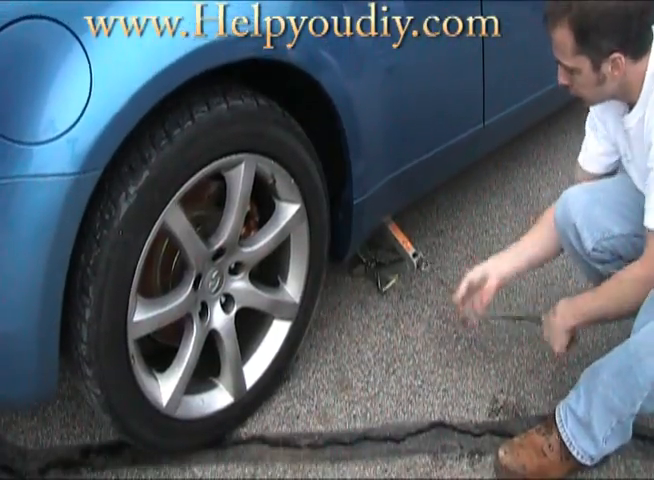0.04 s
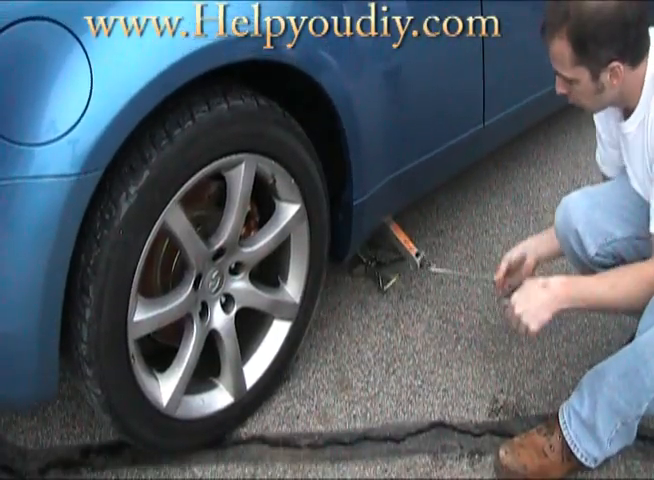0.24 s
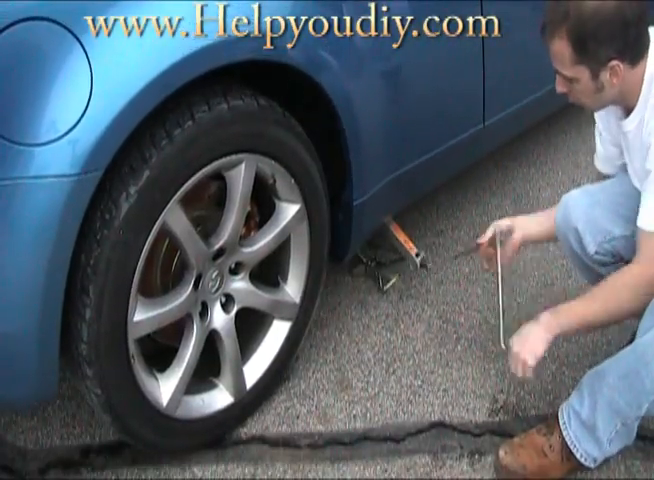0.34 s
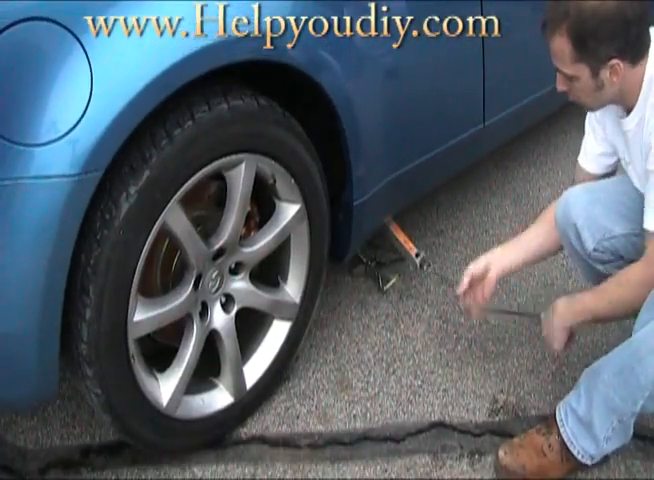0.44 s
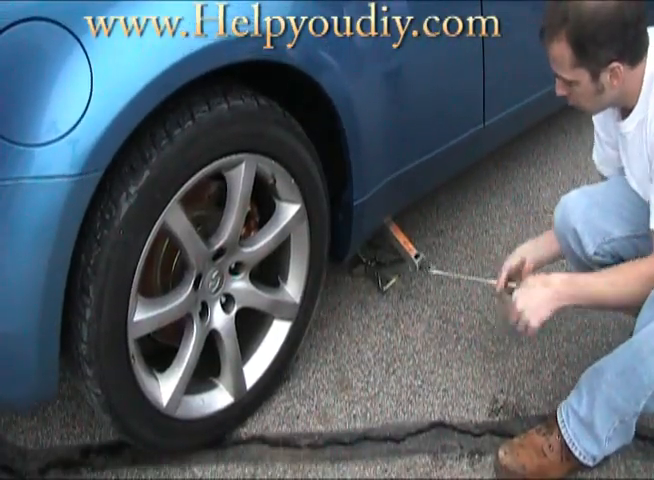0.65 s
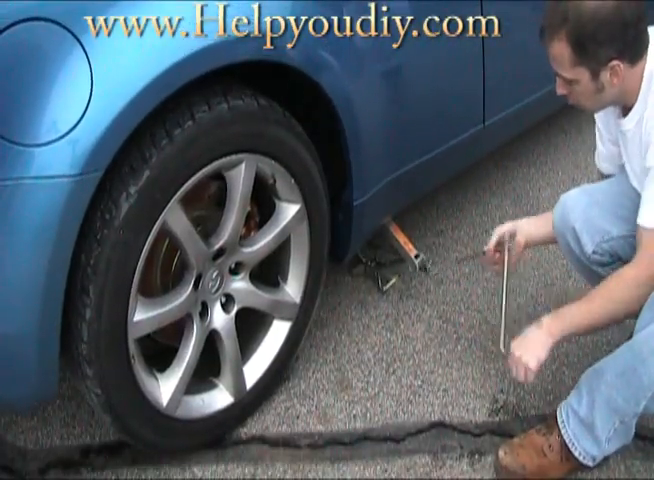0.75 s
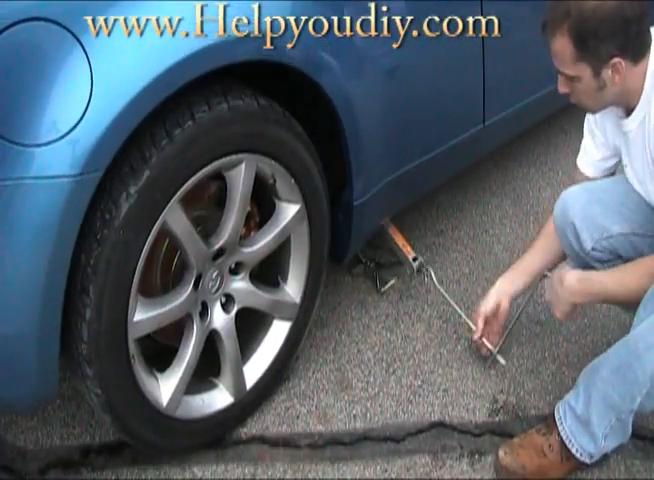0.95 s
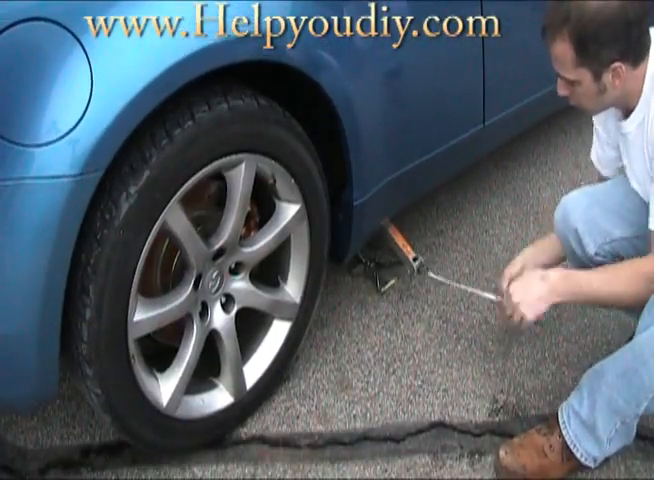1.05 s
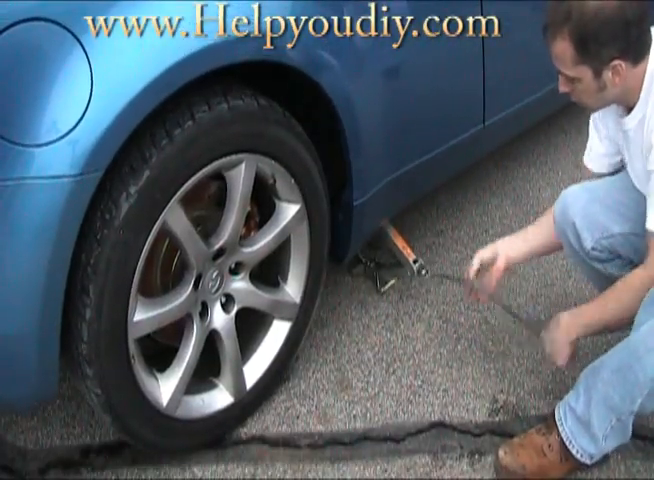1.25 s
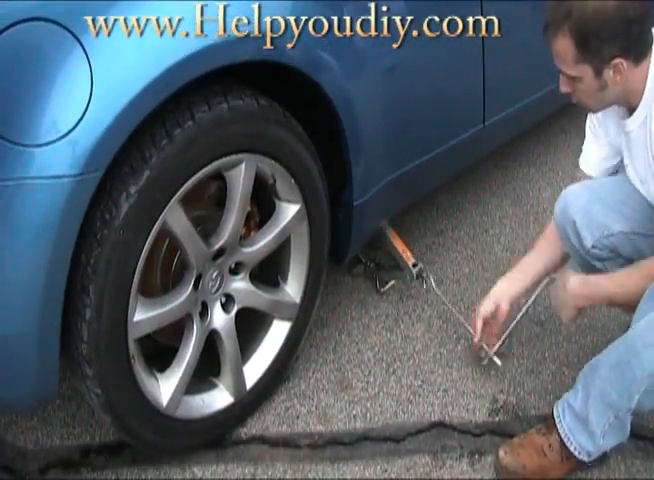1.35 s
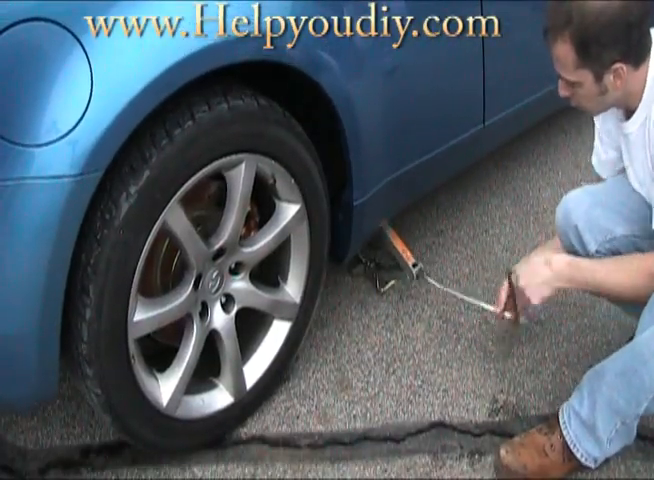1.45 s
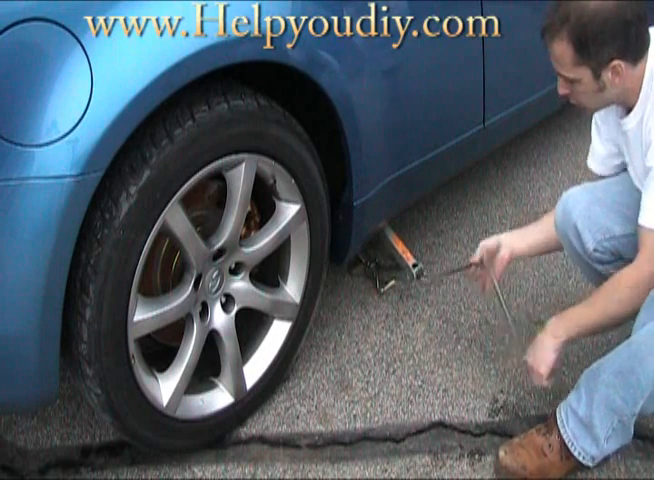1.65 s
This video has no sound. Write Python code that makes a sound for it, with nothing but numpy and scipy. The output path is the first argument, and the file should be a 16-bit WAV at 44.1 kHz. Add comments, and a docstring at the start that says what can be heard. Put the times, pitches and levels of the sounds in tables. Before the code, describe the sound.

Metal clanking of a jack cranked with a steel rod, heard close in stereo outdoors. A dry click at 0.15 s, a short slide, then a loud, bright chattering clank at 0.23-0.26 s whose ring quickly fades. Small ticks follow, with firmer clicks near 1.0 and 1.4 s and faint thread grit. Slight echo, distant traffic and a low hum that swells faintly around 1.45 s.

```python
"""A scissor jack under a car is cranked outdoors with a steel rod handle, heard close by in stereo.
Dry clicks and slides of the hook in the jack's eye, and faint screw-thread grit, are coloured noise.
Near the start the handle chatters into a loud clank: noise bursts, decaying rod modes and a beating pair.
Car body and house fronts return a faint echo; far off lie traffic, as shaped noise, and a low two-tone hum."""
import sys
import numpy as np
from scipy import signal
from scipy.fft import rfft, irfft
from scipy.io import wavfile

SR = 44100
rng = np.random.default_rng(int(sys.argv[2]) if len(sys.argv) > 2 else 0)


def wav_record(signal):
    """Record a signal, one row per channel, as 16-bit PCM in the file named by sys.argv[1]."""
    frames = np.transpose(np.atleast_2d(signal))
    bounded = np.clip(frames, -1, 1)
    # unit amplitude maps onto the largest positive 16-bit level
    quanta = np.round(bounded * 32767).astype(np.int16)
    wavfile.write(sys.argv[1], SR, quanta)


N = 72765
T = np.arange(N) / SR  # s
FREQS = np.maximum(np.arange(N // 2 + 1) * SR / N, 1)  # Hz

# Colour of the distant traffic: (frequency [Hz], relative density [dB per Hz])
TRAFFIC_COLOUR = [(15, -41), (25, -8.5), (113, -1), (281, -5.5), (340, -6.5), (598, -5.5), (895, -4.5),
                  (997, -7), (1080, -8), (1710, -12), (1850, -15), (2630, -20.5), (2850, -22.5),
                  (3720, -26), (4500, -28.5), (5430, -33), (6210, -29.5), (7700, -31), (9810, -36),
                  (14300, -41.5), (15500, -54)]
# Stereo side of the traffic against its middle: (frequency [Hz], level [dB])
TRAFFIC_SIDE = [(30,4),(80,-8.5),(300,-8),(900,-12),(3000,-2),(12000,-2.5)]
TRAFFIC_DB = -47
# Course of the upper hum tone: (time [s], level [dB])
HUM_LEVEL = [(0,-62),(0.6,-66),(0.9,-61),(1.15,-57),(1.45,-49),(1.65,-59)]
HUM_HZ, HUM_LOW_HZ, HUM_LOW_DB = 128.5, 66.5, -61

# Echoes from car body and house fronts: (delay [s], level [dB])
ECHOES = [(.0115,-19),(.027,-36.5),(.072,-34.5)]
NEAR_DB, NEAR_T60_S = -13, 0.087  # scatter under the car
YARD_DB, YARD_T60_S = -25.5, 0.47  # thin outdoor tail
YARD_TOP_HZ = 8950
ROD_SEND_DB = -4.5  # level of the rod's ringing fed to the echoes and tail

# Stereo side of the metal sounds against their middle: (frequency [Hz], level [dB])
METAL_SIDE = [(300,-20),(1200,-27.5),(3000,-25.5),(8000,-15.5),(14000,-2.5)]
CLICK_PAN_DB, CLANK_PAN_DB = -1.5, -1.9  # left against right

# Colour of the loaded jack: (frequency [Hz], relative level [dB])
JACK_COLOUR = [(100,-12.5),(600,-5.5),(1050,-5),(1900,2.5),(2400,5.5),(3400,1.5),(4500,0.5),(5450,-6.5),(6400,2),(7400,3.5),(9300,3.5),(10500,-5.5),(12500,-0.5),(14000,-21),(15500,-22)]
# Faint gritty rubs of the screw thread: (centre [s], half-length to 1/e [s], level [dB])
THREAD_RUBS = [(0.963,0.028,-57),(1.19,0.038,-68),(1.413,0.022,-56),(1.47,0.022,-63)]
THREAD_GRAINS_PER_S, THREAD_SCATTER_DB, THREAD_TOP_HZ = 560, 4, 6900
# The hook slides before it seats: (time [s], decay by 60 dB [s], level [dB], centre [Hz])
SLIDES = [(0.2124,0.026,-47,7000),(0.229,.028,-29,4547),(0.9887,0.043,-41.5,4500),(1.4355,.07,-43.5,4000),(1.4355,0.06,-47,10500)]
SLIDE_Q = 0.74
# Short rings in parts of the jack: (time [s], frequency [Hz], level [dB], decay by 60 dB [s])
RINGS = [(0.157,1080,-35.5,0.14),(0.157,2994,-35,.03),(0.306,5660,-41,0.1),(0.590,4510,-37,0.02),(0.684,2820,-51.5,0.099),(0.777,7420,-48,0.036),(0.983,4450,-47,0.036),(0.996,2342,-31.5,.035),(0.995,6970,-40,0.031),(1.408,2340,-31.5,0.042),(1.408,4404,-36,.03),(1.443,2990,-31,0.023),(1.445,6390,-51,0.02)]
RING_WOBBLE_RAD, RING_WOBBLE_HZ = 0.52, 148.8
# Hook knocks, relative levels in four bands:
# (time [s], low [dB], mid [dB], high [dB], top [dB], decay by 60 dB [s])
CLICKS = [(0.137,-55,-51.5,-71.5,-75.5,0.021),(0.157,-33.5,-30.5,-27,-37.5,0.016),(0.167,-35,-50.5,-64,-66.5,.03),(0.5912,-47,-51.5,-51.5,-49.5,0.021),(0.444,-60,-53.5,-74.5,-80.5,0.031),(0.641,-77.5,-62,-63,-75,0.022),(0.777,-58,-46.5,-62,-55.5,0.034),(0.845,-56,-50,-56,-77,0.03),(0.879,-60,-52.5,-57.5,-67,0.015),(0.928,-46.5,-48,-56,-73,0.028),(0.936,-56,-46.5,-52,-70.5,0.036),(0.996,-38.5,-34.5,-29,-66,0.022),(1.123,-62.5,-55,-62,-75,0.021),(1.2369,-55,-59.5,-56.5,-83,0.028),(1.3797,-52,-48,-56,-78.5,0.023),(1.4067,-41,-38.5,-40.5,-76.5,0.029),(1.4424,-35,-34.5,-27.5,-49.5,0.012),(1.475,-50,-45.5,-61,-62,0.027),(1.602,-85,-65.5,-62,-68,0.088),(1.6272,-66,-55,-62,-59,0.029)]
# Centres of those four bands: (frequency [Hz])
CLICK_BANDS_HZ = [1540, 3600, 7480, 11640]
CLICK_DB, CLICK_RING_DB, CLICK_ATTACK_S = 4, -28.5, 0.00069
BOUNCE_S, BOUNCE_DB = 0.0029, -9

# Blows of the chattering handle: (time [s], relative level [dB], treble tilt [dB per octave])
BLOWS = [(0.2322,-7,-4.5),(0.2356,0,-1.5),(0.2409,2.5,2),(0.2456,-3,-2),(0.2527,-5,13),(0.256,-6,-7.5),(0.2622,-13,-6.5)]
# Dense short modes of hook and jack: (frequency [Hz], relative density [dB per Hz])
RATTLE_COLOUR = [(100,-21),(300,-19.5),(800,-24.5),(1400,-16.5),(1950,-8),(2300,-0.5),(2700,-17),(3200,-5.5),(3600,-5),(4000,-2.5),(4750,1.5),(5400,-12.5),(5900,-3.5),(6500,-0.5),(7100,-3.5),(8200,-3),(9400,-3.5),(10900,-15),(11900,-7),(12600,-13),(13800,-24.5),(14500,-36),(15500,-41)]
RATTLE_DB, RATTLE_T60_S = -14, 0.037
RATTLE_TAIL_DB, RATTLE_TAIL_T60_S = -17, 0.14  # the jack's frame buzzes on after each blow
# Modes of the steel handle: (frequency [Hz], relative level [dB], decay by 60 dB [s])
HANDLE_MODES = [(2313,-24.5,0.092),(2998,-27,0.076),(3963,-26,0.05),(4612,-20,0.022),(4500,-40.5,0.058),(6485,-20,0.036),(6642,-21,0.026),(7240,-26.5,0.091),(8055,-22.5,0.066),(8160,-22.5,0.051),(8770,-25,0.034),(9240,-31,0.062),(11950,-32,.055),(11945,-28.5,0.074),(13600,-40,.07),(14880,-48,.055),(15600,-44,.055)]
PHASE_KICK_RAD = 0.81  # spread of the phase upset that a blow gives a mode
# Close, beating pair of the freed rod: (frequency [Hz], level [dB], decay by 60 dB [s])
SING_PAIR = [(3091,-21.5,0.19),(3102,-22,0.2)]
SING_S, SING_RISE_S, SING_BEAT_LAG_S = 0.253, 0.0023, 0.016

OVERLOAD, TOP_HZ = 1.23, 15900  # drive into the soft rounding; upper limit of the sound


def undb(db):
    """Amplitude ratio from decibels."""
    return 10 ** (np.asarray(db) / 20)


def curve(points):
    """Gain at each frequency from (Hz, dB) points, joined along log frequency."""
    hz, db = np.array(points, float).T
    return undb(np.interp(np.log(FREQS), np.log(hz), db))


def noise(gain):
    """Noise of rms 1 with the given colour."""
    x = irfft(gain * np.exp(2j * np.pi * rng.random(len(FREQS))), N)
    return x / x.std()


def slow(hz):
    """Smooth random wander of spread 1, up to about the given rate."""
    return noise(np.exp(-(FREQS / hz) ** 2))


def fade(start, t60, attack):
    """Quick rise, then exponential decay."""
    age = np.maximum(T - start, 0)
    return np.minimum(age / attack, 1) * np.exp(-np.log(1000) * age / t60)


def place(mid, side, pan_db):
    """Left and right from mid, side and balance."""
    return np.array([(mid + side) * undb(pan_db / 2), (mid - side) * undb(-pan_db / 2)])


def wide_noise(colour, side_colour, pan_db):
    """Stereo noise whose side keeps its own colour and its strength against the middle."""
    side_level = np.linalg.norm(side_colour) / np.linalg.norm(colour)
    return place(noise(colour), noise(side_colour) * side_level, pan_db)


def burst(colour, envelope, pan_db):
    """A short burst of dense vibration; its treble differs most between the ears."""
    return wide_noise(colour, colour * curve(METAL_SIDE), pan_db) * envelope


def traffic():
    """Distant traffic: many far sources merge into broad noise that wavers slightly."""
    colour = curve(TRAFFIC_COLOUR)
    level = undb(TRAFFIC_DB + .5 * slow(6))
    return level * wide_noise(colour, colour * curve(TRAFFIC_SIDE), .2)


def wavering_tone(hz):
    """Sine of rms 1 whose pitch wanders slightly, with a spread just under one percent."""
    pitch = hz * (1 + 0.0074 * slow(6.9))
    return np.sqrt(2) * np.sin(2 * np.pi * np.cumsum(pitch) / SR)


def hum():
    """A low, engine-like hum: two wavering tones, alike in both ears."""
    upper = undb(np.interp(T, *np.array(HUM_LEVEL).T)) * wavering_tone(HUM_HZ)
    lower = undb(HUM_LOW_DB + 3.8 * slow(7)) * wavering_tone(HUM_LOW_HZ)
    return upper + lower


def driveway(x):
    """Scatter under the car, a few distinct echoes and a thin outdoor tail."""
    dull = 1 / np.hypot(1, (FREQS / YARD_TOP_HZ) ** 2)
    response = np.zeros((2, N))
    for db, delay, t60 in [(NEAR_DB, .002, NEAR_T60_S), (YARD_DB, .03, YARD_T60_S)]:
        tail = place(noise(dull), .5 * noise(dull), 0) * fade(delay, t60, 0.0034)
        response += undb(db) * tail / np.sqrt(np.sum(tail ** 2) / 2)  # mean energy 1 per ear, then level
    for delay, db in ECHOES:
        response[:, int(delay * SR)] += undb(db)
    return signal.fftconvolve(x, response, axes=1)[:, :N]


def thread_rubs():
    """Faint gritty rub of the screw thread while cranking: random grains, swelling and fading."""
    struck = rng.random(N) < THREAD_GRAINS_PER_S / SR
    strength = rng.standard_normal(N) * undb(THREAD_SCATTER_DB * rng.standard_normal(N))
    colour = curve(JACK_COLOUR) / np.hypot(1, (FREQS / THREAD_TOP_HZ) ** 2)
    grit = irfft(rfft(struck * strength) * colour, N)
    swell = sum(undb(db) * np.exp(-((T - centre) / length) ** 2) for centre, length, db in THREAD_RUBS)
    return place(swell * grit / grit.std(), 0, CLICK_PAN_DB)


def slides():
    """Brief steel-on-steel rubs: noise around one centre, coloured by the jack."""
    out = 0
    for start, t60, db, hz in SLIDES:
        colour = curve(JACK_COLOUR) / (1 + (SLIDE_Q * (FREQS / hz - hz / FREQS)) ** 2)
        out = out + undb(db) * burst(colour, fade(start, t60, CLICK_ATTACK_S), CLICK_PAN_DB)
    return out


def rings():
    """Single parts of the jack ring for a moment: decaying sines of unsteady phase."""
    out = 0
    for start, hz, db, t60 in RINGS:
        phase = 2 * np.pi * hz * T + RING_WOBBLE_RAD * slow(RING_WOBBLE_HZ)
        out = out + undb(db) * fade(start, t60, 0.00088) * np.sin(phase)
    return place(out, 0, CLICK_PAN_DB)


def clicks():
    """The hook knocks in the eye of the jack and bounces once; each knock is quickly damped."""
    out = 0
    for start, low, mid, high, top, t60 in CLICKS:
        bands = np.array([low, mid, high, top])
        density = bands - 10 * np.log10(CLICK_BANDS_HZ)  # a higher band is wider
        colour = curve(JACK_COLOUR) * curve(list(zip(CLICK_BANDS_HZ, density)))
        knock = fade(start, t60, CLICK_ATTACK_S)
        bounce = undb(BOUNCE_DB) * fade(start + BOUNCE_S, t60 / 2, CLICK_ATTACK_S)
        afterring = undb(CLICK_RING_DB) * fade(start, 3 * t60, CLICK_ATTACK_S)
        level = np.linalg.norm(undb(bands)) * undb(CLICK_DB)
        out = out + level * burst(colour, knock + bounce + afterring, CLICK_PAN_DB)
    return out


def rattle():
    """The handle slips and chatters: each blow shakes the dense short modes of hook and jack."""
    out = 0
    for start, db, tilt_db in BLOWS:
        tilt = undb(tilt_db * np.log2(np.maximum(FREQS, 1500) / 5000))
        shake = fade(start, RATTLE_T60_S, CLICK_ATTACK_S)
        buzz = undb(RATTLE_TAIL_DB) * fade(start, RATTLE_TAIL_T60_S, CLICK_ATTACK_S)
        out = out + undb(db + RATTLE_DB) * burst(curve(RATTLE_COLOUR) * tilt, shake + buzz, CLANK_PAN_DB)
    return out


def handle():
    """The same blows feed energy to the rod's decaying modes and upset their phase."""
    out = 0
    for hz, mode_db, t60 in HANDLE_MODES:
        energy, kicks = 0, 0
        for start, db, tilt_db in BLOWS:
            strength = undb(db + tilt_db * np.log2(hz / 5000))
            energy = energy + (strength * fade(start, t60, CLICK_ATTACK_S)) ** 2
            kicks = kicks + PHASE_KICK_RAD * rng.standard_normal() * (T > start)
        phase = 2 * np.pi * (hz * T + rng.random()) + kicks
        side_level = np.interp(hz, FREQS, curve(METAL_SIDE))
        side = side_level * np.sin(phase + 2 * np.pi * rng.random())
        out = out + undb(mode_db) * np.sqrt(energy) * place(np.sin(phase), side, CLANK_PAN_DB)
    return out


def sing():
    """As the chatter ends the rod rings freely, two bending planes beating."""
    age = T - SING_S - SING_BEAT_LAG_S  # the pair is in step at zero
    ring = 0
    for hz, db, t60 in SING_PAIR:
        ring = ring + undb(db) * fade(SING_S, t60, SING_RISE_S) * np.sin(2 * np.pi * hz * age)
    return place(ring, 0, CLANK_PAN_DB)


def scene():
    """Jack and rod heard directly, their return from the driveway, and the distance behind."""
    background = traffic() + hum()
    jack = thread_rubs() + slides() + rings() + clicks() + rattle()
    rod = handle() + sing()
    return background + driveway(jack + undb(ROD_SEND_DB) * rod) + jack + rod


def record(dry):
    """The microphone channel softly rounds the loudest peaks and steeply cuts the top."""
    rounded = np.tanh(OVERLOAD * dry) / OVERLOAD
    low_pass = signal.ellip(8, .2, 80, TOP_HZ, fs=SR, output="sos")
    return signal.sosfilt(low_pass, rounded)


dry = scene()
out = record(dry)
wav_record(out)
```